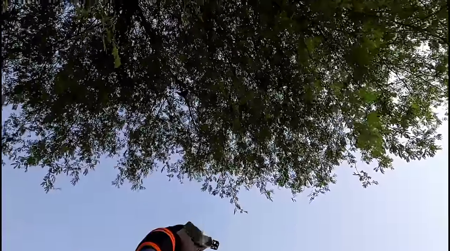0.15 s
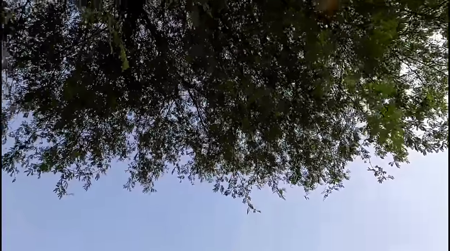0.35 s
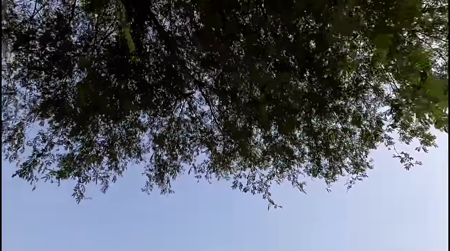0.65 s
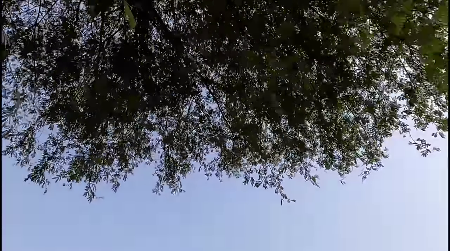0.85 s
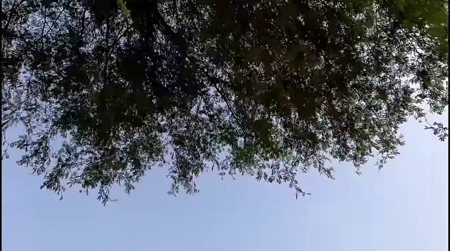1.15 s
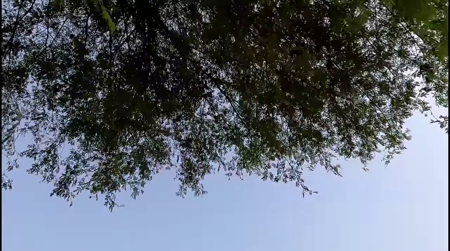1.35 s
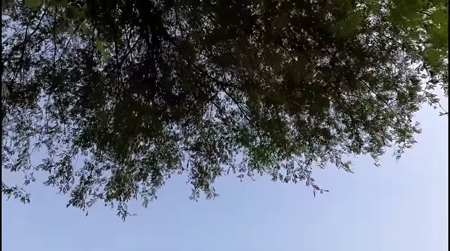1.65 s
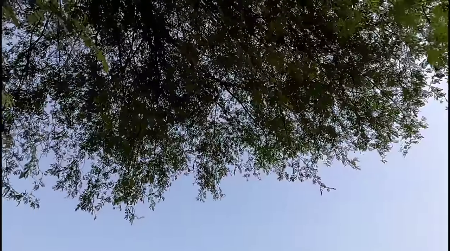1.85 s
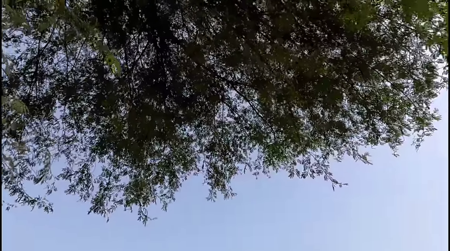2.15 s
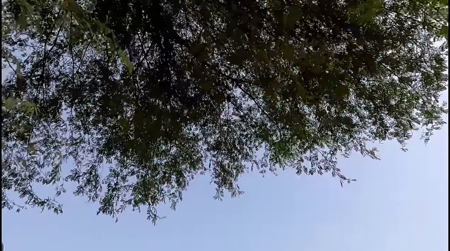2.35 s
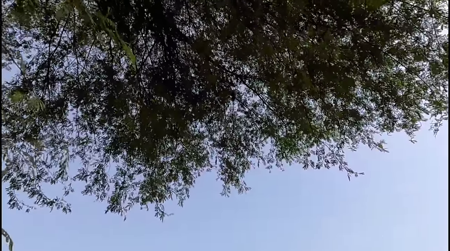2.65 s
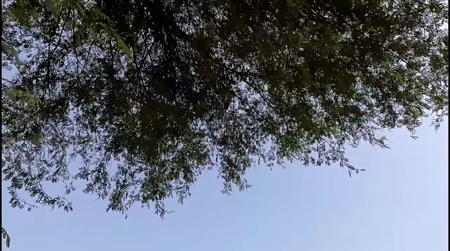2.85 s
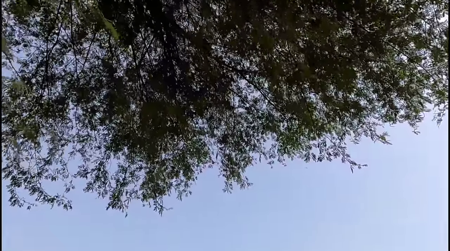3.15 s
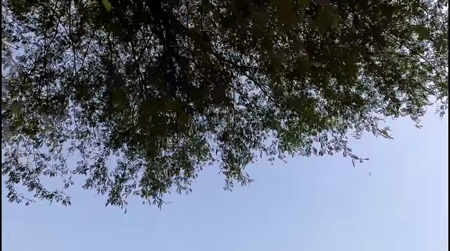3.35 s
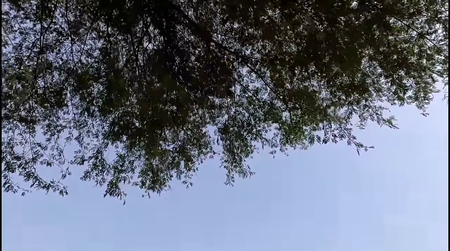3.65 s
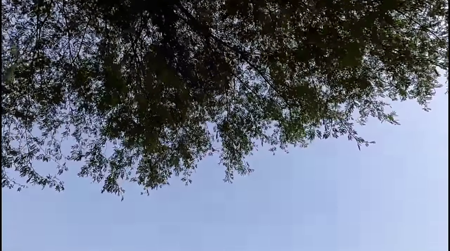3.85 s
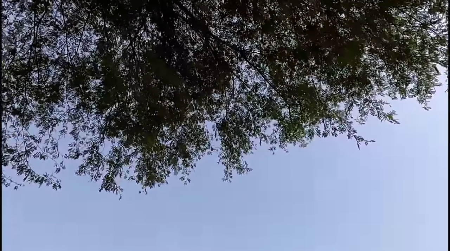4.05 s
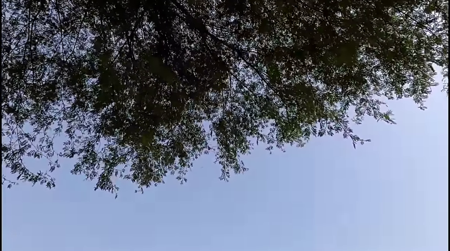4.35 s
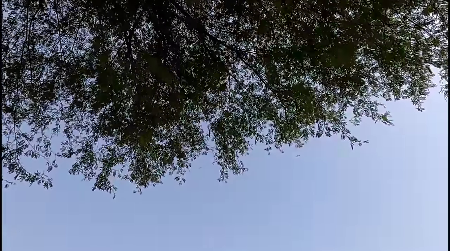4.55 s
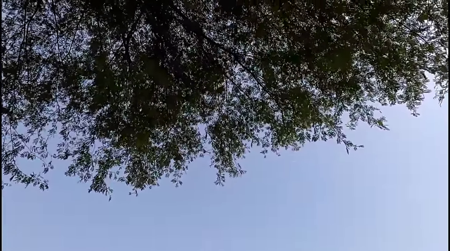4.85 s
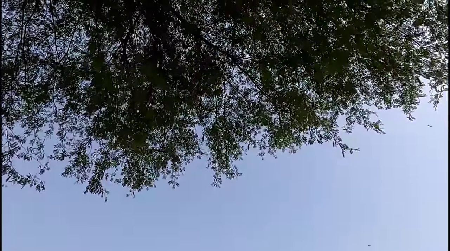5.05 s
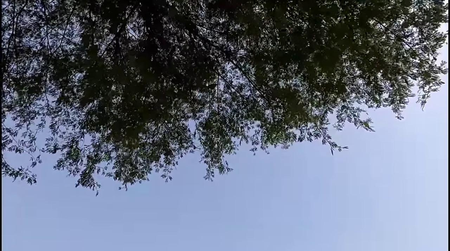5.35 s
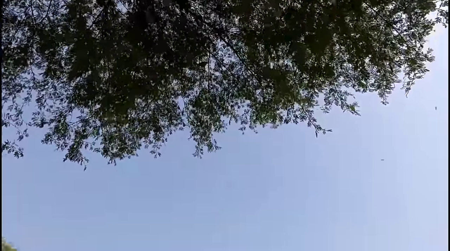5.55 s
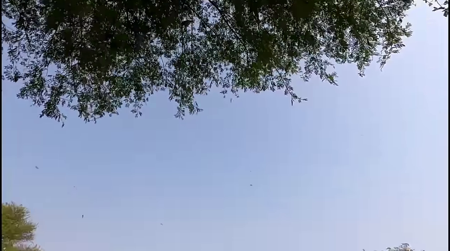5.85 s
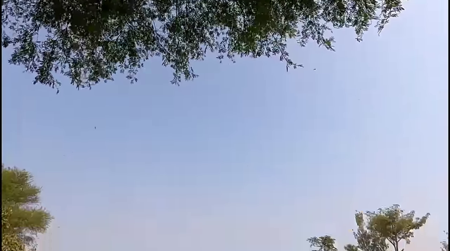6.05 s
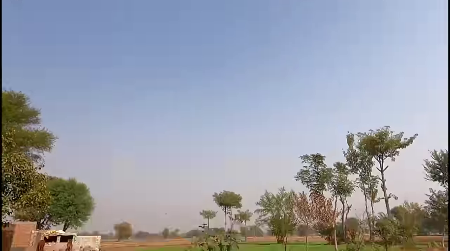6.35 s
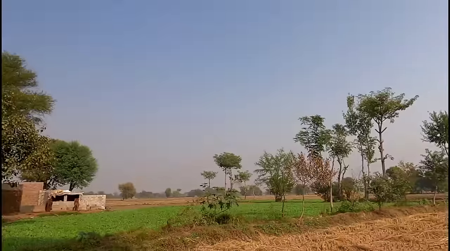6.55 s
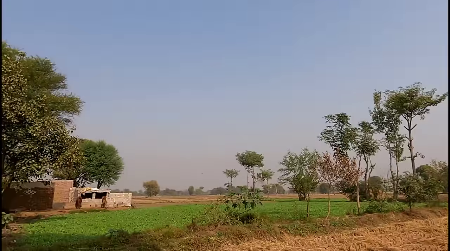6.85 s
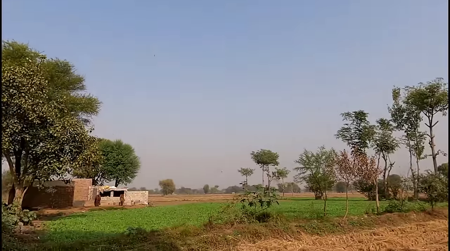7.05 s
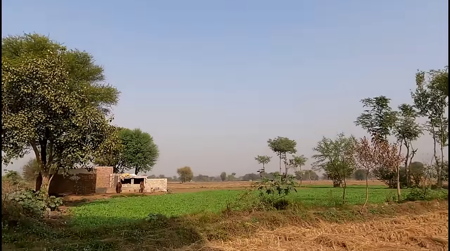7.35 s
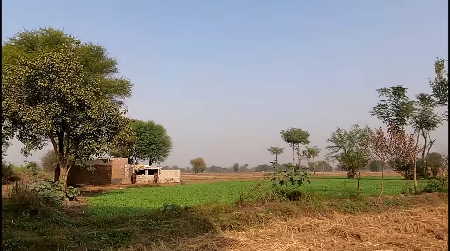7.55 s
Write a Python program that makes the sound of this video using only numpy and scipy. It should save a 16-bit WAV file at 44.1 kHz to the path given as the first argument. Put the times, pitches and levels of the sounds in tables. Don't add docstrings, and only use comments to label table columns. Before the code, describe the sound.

Outdoors under a leafy tree, a slingshot right at the microphone releases with a very loud, dry rubber snap and brief flutter. Quiet countryside follows, with a faint distant engine pump, low wind rumble and thin insect buzz. Two crow caws lead into a bird flapping noisily out through crackling leaves. More caws, hard handling taps, a sleeve rub and a scratchy strap scrape finish it.

```python
import sys
import numpy as np
from scipy import signal
from scipy.fft import rfft, irfft, next_fast_len
from scipy.io import wavfile
from scipy.ndimage import uniform_filter1d, map_coordinates

SR = 44100
rng = np.random.default_rng(int(sys.argv[2]) if len(sys.argv) > 2 else 0)


def amplitude_ratio(level_db):
    exponent = np.asarray(level_db, float) / 20
    return 10 ** exponent


def to_wav(s):
    ch = np.atleast_2d(s).T
    pcm = np.round(np.clip(ch, -1, 1) * 32767)
    wavfile.write(sys.argv[1], SR, pcm.astype(np.int16))


N = 339570
TIME = np.arange(N) / SR


def unit(x):
    return x / np.sqrt(np.mean(x ** 2) + 1e-20)


def along(points, hz):
    f, v = np.transpose(points)
    return np.interp(np.log(hz + 1), np.log(f + 1), v)


def curves(rows):
    s, *cols = np.transpose(rows)
    gate = np.clip(np.minimum(TIME - s[0], s[-1] - TIME) / 0.022, 0, 1)
    return [np.interp(TIME, s, c) for c in cols] + [gate]


def wobble(rate):
    return map_coordinates(rng.standard_normal(int(N * rate / SR) + 4), [TIME * rate])


def filtered(x, response):
    m = next_fast_len(x.shape[-1] + 1024)
    spectrum = rfft(x, m) * response(np.fft.rfftfreq(m, 1 / SR))
    return irfft(spectrum, m)[..., :x.shape[-1]]


def peak(hz, width_hz):
    return lambda f: 1j * f * width_hz / (hz * hz - f * f + 1j * f * width_hz + 1e-9)


def band(noise, hz, width_hz):
    return filtered(noise, lambda f: peak(hz, width_hz)(f) ** 2)


def rush(spectrum, patchy_db):
    z = signal.stft(rng.standard_normal(N + 512), nperseg=512)[2]
    patches = uniform_filter1d(rng.standard_normal(z.shape), size=6, axis=0)
    patches = uniform_filter1d(patches, size=12, axis=1)
    x = signal.istft(z * amplitude_ratio(patchy_db * unit(patches)), nperseg=512)[1][:N]
    return unit(filtered(x, lambda hz: amplitude_ratio(along(spectrum, hz))))


def add(track, s, sound):
    part = track[..., round(s * SR):round(s * SR) + sound.shape[-1]]
    part += sound[..., :part.shape[-1]]


def puff(db, bands, t60, apart=0, attack=0.000067):
    t = np.arange(SR // 10 if t60 > .03 else SR // 36) / SR
    noise = rng.standard_normal((2, SR // 10))[:, :len(t)]
    burst = amplitude_ratio(-60 * t / max(t60, .001)) * (1 - np.exp(-t / attack)) * noise
    mid, side = filtered(burst, lambda f: sum(amplitude_ratio(v) / np.sqrt(w) * peak(hz, w)(f) ** 2 for hz, w, v in bands))
    return amplitude_ratio(db) * np.array([mid + apart * side, mid - apart * side]) / np.abs(mid).max()


# time in seconds, strength in dB.
AIR = [(0.0, -41.5), (0.62, -59.5), (0.92, -49), (1.18, -54.5), (3.15, -48), (3.45, -53.5), (3.95, -49),
       (4.87, -56.5), (5.0, -48), (5.7, -48.5), (6.13, -56.5), (6.38, -52), (6.48, -39), (6.62, -44.5),
       (6.78, -50.5), (7.3, -51), (7.7, -45.5)]
# time in seconds, level in dB.
FAR = [(0, -66), (2.1, -65.5), (2.4, -57), (3.1, -64.5), (4.1, -58), (4.8, -62), (6.4, -60.5), (6.8, -64.5),
       (7.7, -64)]
# frequency in Hz, strength in dB per Hz.
RUMBLE = [(8.8, -42), (15, -12.5), (33, -3), (54, -0.5), (109, -21.5), (210, -27.5), (255, -55), (500, -54),
          (650, -87), (1100, -120)]
MURMUR = [(150, -46), (250, -12), (429, -18.5), (557, -15.5), (845, -16), (1240, -7.5), (1350, -7.5),
          (1820, -10.5), (3910, -30), (4490, -29), (7190, -32), (7840, -39), (16000, -48.5)]
ASIDE = [(15, -30.5), (25, -2.5), (44, -3.5), (81, -16.5), (154, -14.5), (475, -30), (1500, -20.5),
         (4750, -37), (7280, -38), (15000, -59)]


def field():
    rumble_db, murmur_db = curves(AIR)[0], curves(FAR)[0]
    low = amplitude_ratio(rumble_db + 4 + 2.2 * wobble(5.6)) * rush(RUMBLE, patchy_db=-1.0)
    murmur = amplitude_ratio(murmur_db - 1.5 + 0.78 * wobble(4.1)) * rush(MURMUR, patchy_db=2.5)
    return low, murmur, amplitude_ratio(-55.5) * rush(ASIDE, patchy_db=2.0)


# time in seconds, level in dB.
INSECTS = [
    (6080, .3, [(0, -82.5), (2.9, -91), (6.9, -80), (7.7, -76)]),
    (5420, .2, [(0, -92.5), (4.6, -88), (7.7, -85)]),
]
# start in seconds, length in seconds, top level in dB.
CICADA = [
    (0.701, 0.36, -88),
    (2.532, .42, -85),
    (4.52, 0.65, -79),
    (6.64, 0.71, -76.5),
]


def insects():
    buzz_hz, swell_db = 83, 5
    beat = np.cos(2 * np.pi * buzz_hz * TIME + .5 * wobble(15))
    phrases = []
    for s, length, db in CICADA:
        phrases.append([(s, db - swell_db), (s + 0.79 * length, db), (s + length, db - swell_db)])
    singers = [(.05, *row) for row in INSECTS] + [(.085, 7100, 0.28, *phrases)]
    out = 0
    for width_share, hz, depth, *songs in singers:
        level = sum(gate * amplitude_ratio(db) for db, gate in map(curves, songs))
        tone = band(rng.standard_normal(N), hz, width_share * hz)
        out = out + level * unit(np.exp(depth * beat) * tone)
    return out * amplitude_ratio(wobble(8.1))


# start in seconds, level in dB, pitch in Hz, width in Hz, time to die by 60 dB in s.
SLAPS = [(0.0533, -45, 7840, 7000, 0.0012), (.0625, -50, 5960, 2500, .004), (.0727, -39, 5500, 3500, 0.046),
         (0.0835, -10, 1750, 1100, .003), (.085, -19, 2780, 2500, .03), (0.0948, -15, 2400, 1800, 0.0064),
         (0.084, -21.5, 6950, 5990, 0.0069), (.0865, -13.5, 6430, 5000, 0.047),
         (0.0893, -19.5, 5526, 4000, 0.016), (.093, -15, 1146, 900, 0.0059),
         (0.0947, -2, 6520, 1520, 0.0058), (0.0945, -10.5, 5200, 1500, 0.011),
         (0.0949, -8, 10010, 3960, 0.01), (.099, -28, 5000, 7000, 0.13), (.1175, -21, 4084, 7100, .02),
         (.119, -23, 1465, 1500, 0.016), (.126, -28, 5083, 8000, 0.025), (0.157, -18, 5200, 1500, 0.0025),
         (0.1571, -32, 1310, 1020, 0.0042), (.159, -42, 4360, 2800, 0.22)]


def slingshot():
    out = np.zeros((2, N))
    for s, db, hz, width_hz, t60 in SLAPS:
        lean_db = along([(1500, -4), (4000, 0)], hz) / 2
        slap = puff(db, [(hz, 1.6 * width_hz, 0)], t60, apart=.25)
        add(out, s, amplitude_ratio([[lean_db], [-lean_db]]) * slap)
    t = np.arange(round(.022 * SR)) / SR
    add(out, .061, amplitude_ratio(-49.0) * np.sqrt(t / t[-1]) * np.sin(2 * np.pi * 7900 * t))
    return out


# start in seconds, level in dB, pitch in Hz, width in Hz,
# time to die by 60 dB in seconds, share that differs between the sides.
STRAYS = [(.0868, -27, 12600, 1500, .012, 1.5), (.0947, -17, 12800, 2500, .006, 1.5),
          (.087, -24, 900, 900, 0.011, .9), (.104, -37.5, 7500, 1500, 0.18, 0.54),
          (3.222, -49, 6000, 6000, .006, .2), (3.299, -52, 5000, 6000, .01, .2),
          (3.377, -38.5, 5000, 6000, .005, .2), (3.388, -43, 1300, 900, .03, .2),
          (3.428, -42, 4000, 4000, .006, .2), (3.462, -42.5, 1300, 800, 0.088, .2),
          (3.644, -41, 1200, 900, .03, .2), (4.2, -47, 1350, 500, 0.21, .2),
          (4.23, -45, 1300, 500, .12, .2), (4.57, -48, 1400, 900, .03, .2),
          (4.669, -58, 4500, 4000, .004, .2), (4.937, -45, 1050, 600, .012, .1),
          (5.253, -44, 1300, 900, .012, .2), (6.486, -45, 1050, 800, .012, .2),
          (7.365, -49, 1300, 500, 0.065, .2), (7.624, -56, 4800, 2500, .004, .2),
          (7.697, -51, 3000, 6000, .01, .2), (3.237, -36, 6000, 5000, .003, .2),
          (.055, -56, 4500, 5000, .5, .3), (5.746, -53, 2800, 2000, .004, .2),
          (0.0944, -18, 11000, 2500, .005, .4), (0.0874, -24, 400, 300, .03, .8)]


def strays():
    out = np.zeros((2, N))
    for s, db, hz, width_hz, t60, apart in STRAYS:
        add(out, s, puff(db, [(hz, width_hz, 0)], t60, apart, attack=.0004))
    return out


# start in seconds, level in dB, pitch in Hz, time to die by 60 dB in seconds, left-over-right in dB.
RECOIL = [
    (.078, -30, 180, .05, 21.5),
    (0.0868, 2, 209, 0.02, 1),
    (0.0958, -14.5, 200, 0.035, -24),
    (.0862, -17, 380, 0.012, 20),
    (.117, -18.5, 112.1, 0.085, 2),
]
PUSHES = [
    (.478, -42, 189.8, 0.044, 11),
    (3.703, -20, 200, 0.012, 0),
    (4.537, -33.5, 180.7, 0.047, 4.5),
    (5.0012, -16, 187.6, 0.033, -11),
    (5.138, -31, 200, 0.053, -12),
    (5.511, -25.5, 219, 0.042, -11.5),
    (7.62, -38.5, 179.9, 0.041, 7),
]
KNOCKS = [
    (1.137, -43, 321, 0.049, -0.5),
    (2.483, -44, 353, 0.018, 0.3),
    (3.986, -33, 200, 0.092, -0.5),
]


def shoves():
    out, t = np.zeros((2, N)), np.arange(SR // 5) / SR
    click_s, give_s = 0.00015, .001
    click = 0.31 * t / click_s * np.exp(1 - t / click_s)
    late = np.maximum(t - give_s, 0)
    for rows, slowing, edge in (RECOIL, 49, 0), (PUSHES, 107, click), (KNOCKS, 8.6, click):
        for s, db, hz, t60, pan_db in rows:
            swing = np.sin(2 * np.pi * hz * late / (1 + slowing * late)) * (1 - np.exp(-late / .0006))
            level = amplitude_ratio(db - 60 * t / t60 + [[pan_db / 2], [-pan_db / 2]])
            add(out, s, -level * (edge + swing))
    return out


# pitch in Hz, level in dB, time to die by 60 dB in seconds.
PUMP = [(45, -48.5, 0.14), (78, -44.5, 0.076), (98, -53, 0.041), (200, -53, 0.077)]


def pump():
    out, t = np.zeros(N), np.arange(SR // 4) / SR
    firings_per_s = 5.345
    for s in np.arange(.085, 7.7, 1 / firings_per_s):
        for lag, db in (0, 8.5), (.052, 1):
            ring = 0
            for hz, level, t60 in PUMP:
                fade = amplitude_ratio(level + rng.normal(0, 3) - 60 * t / t60)
                ring = ring + fade * np.sin(2 * np.pi * hz * rng.normal(1, .08) * t)
            add(out, s + lag, amplitude_ratio(db) * ring * (1 - np.exp(-t / 0.012)))
        add(out, s, puff(-58.0, [(1360, 720, 0)], 0.065, attack=.004)[0])
    return out


# time in seconds, strength in dB.
LEAVES = [
    [(0.13, -82.5), (0.33, -75.5), (0.73, -84.5), (0.95, -91)],
    [(2.26, -92), (2.6, -95)],
    [(2.86, -87), (2.96, -69), (3.3, -71), (3.54, -62), (3.87, -67.5), (4.03, -64.5), (4.14, -70),
     (4.29, -73), (4.43, -69), (4.52, -88.5), (4.75, -78)],
    [(7.23, -67.5), (7.37, -68.5)],
]
# frequency in Hz, strength in dB per Hz.
LEAF = [(410, -32), (700, 3.5), (1260, -6.5), (1380, -14), (2460, -4), (6400, -10), (8310, -18),
        (12200, -19.5), (14800, -31), (16000, -66)]


def leaves():
    grain = amplitude_ratio(3.5 * wobble(13) + 3 * wobble(70) + 3.5 * wobble(800)) * rush(LEAF, patchy_db=2)
    swish = rush([(100, 5.5), (220, 7.0), (500, -4.5), (900, -7.5), (1600, -45.5)], patchy_db=2.0)
    swish = swish * amplitude_ratio(0.9 * wobble(25))
    shake = 0
    for rows in LEAVES:
        db, gate = curves(rows)
        shake = shake + gate * amplitude_ratio(db)
    sway_s = 0.42
    sway = signal.lfilter([1 / (sway_s * SR)], [1, 1 / (sway_s * SR) - 1], shake)
    return amplitude_ratio(8.0) * shake * unit(grain) + amplitude_ratio(6) * np.maximum(sway, shake) * unit(swish)


# centre in Hz, width in Hz, level in dB.
BANDS = [(473, 820, 13.5), (1200, 1230, 11), (4700, 4300, 7), (10660, 22000, 12.5)]
THUMP, TREBLE = (1, 1, 0, 0), (0, 0, 1, 1)


def contacts(rows, colour_db, moved, crack_db, body_db, t60, attack, apart, crack_t60=0.0033):
    out = np.zeros((2, N))
    lead_in = np.linspace(0, 1, SR // 40 + 1) ** 2
    for s, db, shift_db, *sharp_db in rows:
        bands = [(hz, w, v + c + m * shift_db) for (hz, w, v), c, m in zip(BANDS, colour_db, moved)]
        sharp = sum(sharp_db)
        body = puff(db + body_db, bands, t60, apart, attack * amplitude_ratio(-sharp))
        lead = body[:, SR // 40::-1] * lead_in
        add(out, s - 1 / 40, amplitude_ratio(-10.5) * lead)
        add(out, s, body)
        add(out, s, puff(db + crack_db + sharp, bands, crack_t60, apart))
    return out


# start in seconds, peak in dB, treble in dB.
BRUSHES = [(0.296, -50, 0), (0.372, -46, -4), (0.384, -41, -9), (0.445, -43.5, -2), (0.568, -50, -4),
           (0.653, -50, 6), (1.138, -50, -26.5), (1.864, -60, -3.5), (2.275, -54, -2), (5.262, -50.5, 0),
           (5.253, -46, -9), (5.744, -47.5, -33), (5.874, -53, -23)]


def brushes():
    return contacts(BRUSHES, (-18, -6.5, 3, -11), TREBLE, crack_db=-2.5, body_db=-6.0, t60=0.18,
                    attack=0.0003, apart=0.093)


# start in seconds, level in dB, pitch in Hz, width in Hz, time to die by 60 dB in seconds.
RAPS = [(1.454, -49.5, 1670, 1500, .1), (1.466, -37.5, 1250, 600, 0.018), (1.466, -51, 3530, 3000, .005),
        (1.468, -50.5, 2200, 2000, 0.13), (5.817, -41.5, 1200, 699.5, .008), (5.817, -56, 3180, 2500, .003),
        (6.326, -49.5, 1100, 600, .01), (6.326, -53, 3490, 3000, .004), (6.344, -39.5, 1100, 798, 0.011),
        (6.345, -48, 3770, 3000, 0.0043), (6.399, -39.5, 1137, 900, 0.009), (4.539, -60, 5500, 8940, .003),
        (5.159, -56, 4000, 5000, 0.0032), (6.836, -60, 4700, 1500, .005), (6.912, -64, 9960, 4000, .004),
        (6.919, -58.5, 7500, 5000, .004), (6.935, -64, 9540, 3000, .004), (7.082, -64, 8000, 4970, .004),
        (7.134, -65, 10500, 4000, 0.0038), (7.198, -63, 9000, 6020, .006), (7.385, -63, 8000, 3000, .005),
        (7.48, -70, 9060, 3000, .004)]
SCRAPES = [(7.2472, -48, 8000, 4000, .004), (7.25, -52, 9500, 4000, .005),
           (7.2624, -42, 6000, 10000, 0.0065), (7.2637, -45, 5000, 9000, .006),
           (7.27, -43, 6600, 2000, .012), (7.2764, -46, 8500, 3500, 0.01), (7.2824, -42, 7200, 3000, .01),
           (7.285, -46, 8000, 4500, .008), (7.2912, -36, 4970, 9000, 0.0089),
           (7.296, -44, 6500, 6000, 0.0046), (7.296, -38.5, 1530, 1200, 0.0065),
           (7.3055, -38.5, 7600, 2500, 0.0038), (7.3049, -39, 3500, 4000, .006),
           (7.3081, -41, 4000, 5000, 0.0061), (7.3295, -53, 7000, 10000, .004),
           (7.3386, -45, 9500, 3000, .005), (7.3414, -47.5, 10500, 4500, 0.0067),
           (7.346, -51.5, 11100, 4000, .03)]


def housing():
    out = np.zeros((2, N))
    for s, db, hz, width_hz, t60 in [*RAPS, *SCRAPES]:
        add(out, s, puff(db, [(hz, width_hz, 0)], t60, apart=0.17, attack=0.00025))
    return out


# start in seconds, length in seconds, first pitch in Hz, last pitch in Hz, level in dB.
CHIRPS = [
    (5.543, .018, 3500, 4900, -72),
    (5.589, .033, 5250, 3450, -72),
    (5.641, .012, 3800, 3500, -75),
    (5.665, .009, 3600, 3900, -70),
    (1.95, .02, 3200, 3200, -75),
    (2.14, .025, 3150, 3200, -73),
    (2.555, .022, 3200, 3200, -70),
    (2.22, .04, 620, 620, -63),
]


def songbirds():
    out = np.zeros(N)
    for s, length, from_hz, to_hz, db in CHIRPS:
        hz = np.linspace(from_hz, to_hz, int(length * SR))
        whistle = np.sin(2 * np.pi * np.cumsum(hz) / SR)
        add(out, s, amplitude_ratio(db) * np.sqrt(np.hanning(len(hz))) * whistle)
    return out


# start in seconds, length in seconds, top pitch in Hz, top level in dB,
# share of the length before the top.
CAWS = [
    (1.955, 0.285, 500, -58.5, 0.72),
    (2.258, .275, 538, -51, 0.42),
    (4.717, 0.29, 487, -55, 0.5),
    (5.305, .32, 462, -57, .5),
    (5.989, .31, 453, -56, .45),
]
# overtones 2, 3, 4 and 5 in dB, high rasp in dB.
THROATS = [(.5, 0, 2, -18, -34), (1, 2.5, 3, -20, -24), (1.5, 3, 0, -16, -34), (-5, 2.5, 2, -12, -34),
           (-7, 1, 6, -4, -32)]
# share of pitch lost at the start, at the end, brightening in dB per overtone.
ARCHES = [(.11, .1, 5), (.1, .13, -.5), (.15, .11, 3), (.11, .1, 4), (.05, .05, 2)]
HOARSE = (.34, .24, .28, .28, .3)


def crows():
    out = np.zeros(N)
    drift, jitter, flicker = wobble(30), wobble(200), wobble(90)
    flicker = np.array([np.roll(flicker, k * SR // 3) for k in range(8)])
    air = rng.standard_normal(N)
    rasp, hiss = unit(band(air, 1650, 800)), unit(band(air, 4000, 450))
    cycles_per_stutter, stagger = 6.9, 2.6
    for caw, throat, arch, hoarse in zip(CAWS, THROATS, ARCHES, HOARSE):
        s, length, top_hz, top_db, rise = caw
        *levels, high_db = throat
        sag, drop, bright_db = arch
        bend, gate = curves([(s, -1), (s + rise * length, 0), (s + length, 1)])
        db = top_db - 11 * np.abs(bend) ** 2.6
        on = gate > 0
        bent = bend[on]
        hz = top_hz * (1 - np.where(bent < 0, sag, drop) * bent ** 2)
        stutter = np.cumsum(hz) * 2 * np.pi / SR / cycles_per_stutter + 2.5 * hoarse * drift[on]
        shaky_hz = hz * (1 + .045 * np.sin(stutter) + .045 * hoarse * jitter[on])
        turn = np.cumsum(shaky_hz) * 2 * np.pi / SR
        voice = 0
        for k, v in enumerate([-22, *levels]):
            tone_db = v + bright_db * (k - 2) * bent + 4.2 * hoarse * flicker[k, on]
            if k < 2:
                tone_db = tone_db - 9 * bent ** 2
            swell = 1 + .55 * np.cos(stutter + k * stagger)
            voice = voice + amplitude_ratio(tone_db) * swell * np.sin((k + 1) * turn + k)
        voice = unit(voice) + .9 * hoarse * rasp[on]
        voice = voice + amplitude_ratio(high_db) * hiss[on] * (1 + .5 * np.sin(stutter))
        out[on] += (gate * amplitude_ratio(db))[on] * unit(voice)
    return out


# start in seconds, peak in dB, thump in dB, crack in dB.
FLAPS = [(2.905, -41.5, -15.5, -6), (2.961, -43.5, -19, -7), (2.993, -39, -17, -2.5), (3.048, -46, -21, -7),
         (3.071, -42, -12, -2), (3.105, -37, -11, -1.5), (3.128, -39.5, -16, -5), (3.167, -38.5, -18, -1.5),
         (3.197, -41, -21, 4), (3.237, -41, -17.5, 5), (3.256, -46, -18, -7), (3.338, -35.5, -20, -3),
         (3.368, -35.5, -12, -16), (3.418, -34, -16, -4), (3.468, -35, -13, -9), (3.5, -32.5, -17.5, -1.5),
         (3.536, -38.5, -10, -2), (3.549, -41, -17, -6), (3.572, -38, -11, -8), (3.61, -33.5, -17.5, 1),
         (3.615, -36, -15, 0.5), (3.636, -32, -13.5, -13), (3.674, -45, -17, -2), (3.705, -36, -14, 4),
         (3.718, -38, -22, 2.5), (3.741, -41, -26, -9), (3.787, -37, -16, -13), (3.801, -35.5, -6, -10),
         (3.809, -37.5, -20, -4), (3.822, -39, -15, -7), (3.844, -43, -19, 0), (3.898, -37.5, -15, 4),
         (3.911, -44, -8, -10), (3.932, -39, -22, -1), (3.966, -37.5, -19, -3), (3.985, -27.5, -18.5, 1.5),
         (3.996, -36.5, -15, -4), (4.028, -40, -18, -3), (4.069, -33.5, -19, -1), (4.075, -34, -12, 2),
         (4.082, -39, -16, 2), (4.167, -42.5, -27, -10), (4.192, -33.5, -9, -5), (4.289, -45, -9.5, -4),
         (4.301, -39, -2, -12), (4.339, -46, -11, -2), (4.404, -46.5, -15, 3), (4.438, -44.5, -16, -4)]


def wing_beats():
    return contacts(FLAPS, (1.5, 4, -6.5, -17.5), THUMP, crack_db=3, body_db=-6.5, t60=0.096,
                    attack=0.0012, apart=0.22)


# start in seconds, peak in dB, treble in dB.
TICKS = [
    (5.0011, -26.5, -16.5),
    (5.14, -37.5, -21),
    (5.511, -32.5, -23),
    (6.229, -44, -21),
    (6.662, -41, -25),
]


def taps():
    return contacts(TICKS, (-30, -10.5, 11, -1), TREBLE, crack_db=-5.0, body_db=-18.0, t60=0.012,
                    attack=0.00015, apart=0.27, crack_t60=0.0042)


# time in seconds, pressure in dB.
SLEEVE = [(6.33, -72), (6.5, -63.5), (6.63, -60.5), (6.74, -68.5), (6.86, -83)]


def sleeve():
    db, gate = curves(SLEEVE)
    share = np.interp(TIME, [6.48, 6.57], [.6, .1])
    colours = [(3000, 1400), (4500, 2100), (450, 510)]
    dull, bright, low = (unit(band(rng.standard_normal(N), hz, width)) for hz, width in colours)
    low_db = 0.5 + db.max() + 1.2 * (db - db.max())
    cloth = np.sqrt(1 - share) * dull + np.sqrt(share) * bright
    return gate * amplitude_ratio(0.89 * wobble(60)) * (amplitude_ratio(db) * cloth + amplitude_ratio(low_db) * low)


# frequency in Hz, time to die by 60 dB in seconds.
CROWN = [(300, 0.39), (2000, 0.14), (9000, 0.041)]


def crown(x):
    hz, t, z = signal.stft(rng.standard_normal((2, SR // 2)), SR, nperseg=256)
    fade = amplitude_ratio(-60 * t / along(CROWN, hz)[:, None])
    tail = signal.istft(z * fade, SR, nperseg=256)[1]
    delayed = np.pad(x, (300, 0))[None]
    return signal.fftconvolve(delayed, tail / np.linalg.norm(tail[0]), axes=1)[:, :N]


# time in seconds, width in dB.
TURN = [(0, -12), (.6, -24), (.8, -51), (2.7, -49.5), (3.4, -23), (4.5, -11.5), (5.05, -13.5), (6.2, -11.5),
        (6.5, -6.5), (6.9, -12.5), (7.7, -13)]


def scene():
    width_db, _ = curves(TURN)
    low_db, high_db = -3 * amplitude_ratio(width_db), 6.5 * amplitude_ratio(width_db)
    birds = crows() + songbirds()
    tree = wing_beats() + leaves()
    hand = taps() + sleeve() + brushes() + housing()
    snap = slingshot()
    rumble, murmur, aside = field()
    echoes = crown(amplitude_ratio(0.45 * width_db - 11.5) * tree[0] + amplitude_ratio(width_db + 1.0) * birds + amplitude_ratio(-23.0) * snap[0])
    low = (rumble + pump()) * amplitude_ratio([low_db / 2, -low_db / 2])
    high = (murmur + insects() + birds + hand) * amplitude_ratio([high_db / 2, -high_db / 2])
    hiss = amplitude_ratio(-88.0) * rng.standard_normal((2, N))
    sides = amplitude_ratio(width_db) * aside * [[1], [-1]]
    near = tree + shoves() + snap * amplitude_ratio([[.7], [-.7]]) + strays()
    return low + high + near + echoes + hiss + sides


def band_limit(x):
    return signal.sosfilt(signal.butter(12, 16430, fs=SR, output="sos"), x)


# frequency in Hz, gain in dB.
MICROPHONE = [(9000, 1), (12000, -2), (14000, -7.5), (15500, -18), (16000, -41), (16500, -70)]


def record(dry):
    x = dry / (1 + np.abs(dry / .87) ** 6) ** (1 / 6)
    x = filtered(x, lambda hz: amplitude_ratio(along(MICROPHONE, hz)))
    return band_limit(x)


dry = scene()
out = record(dry)
to_wav(out)
```